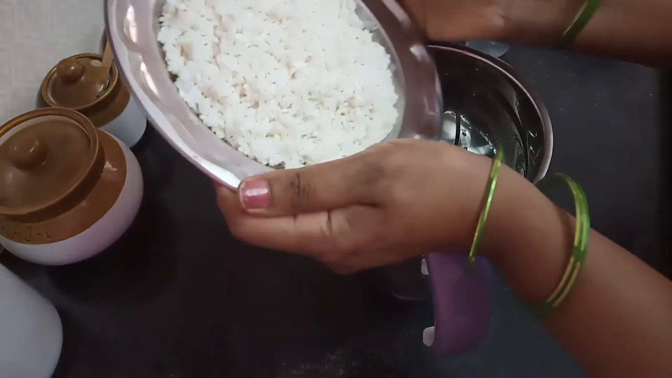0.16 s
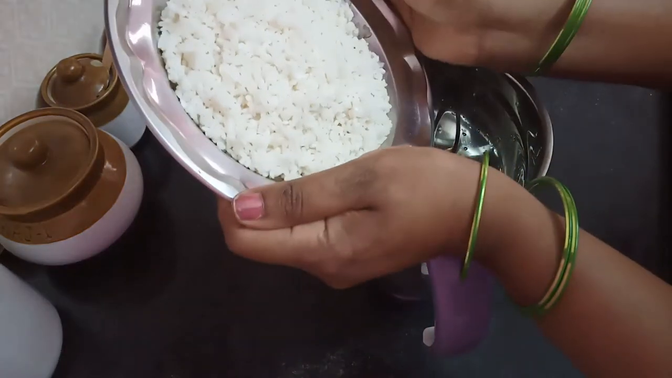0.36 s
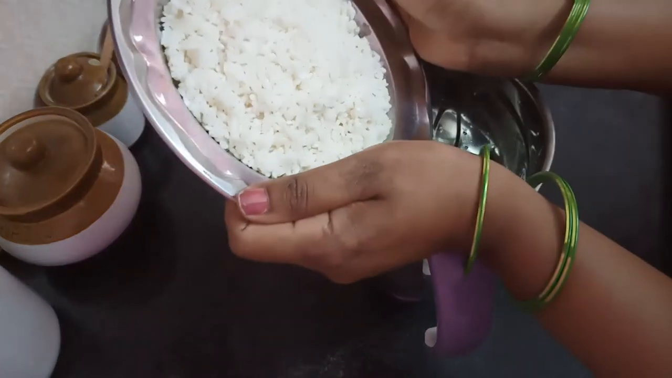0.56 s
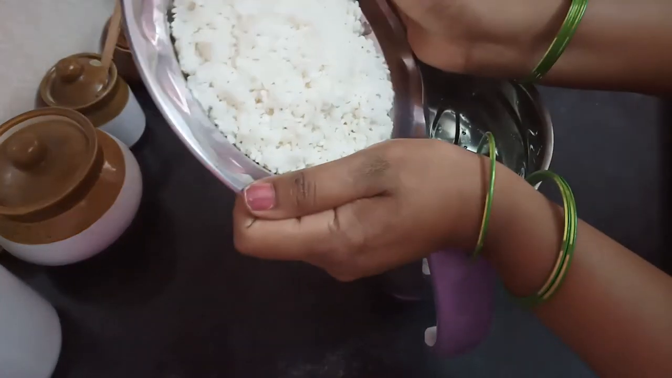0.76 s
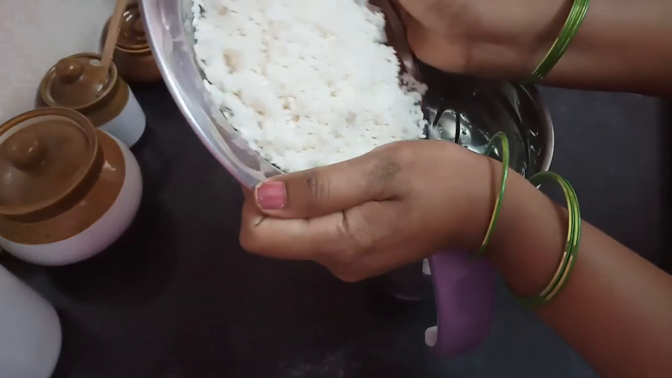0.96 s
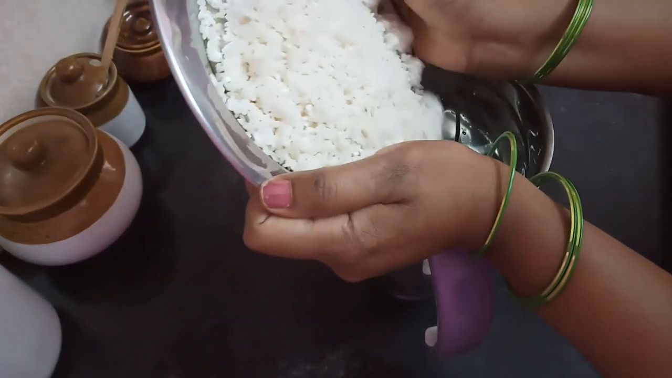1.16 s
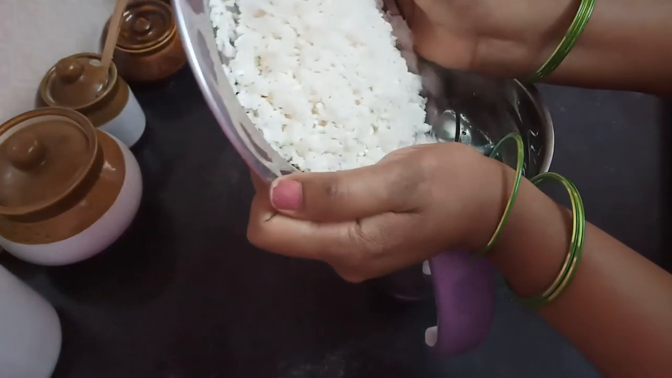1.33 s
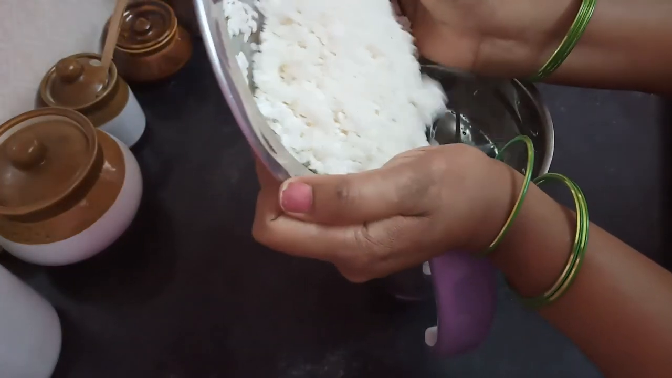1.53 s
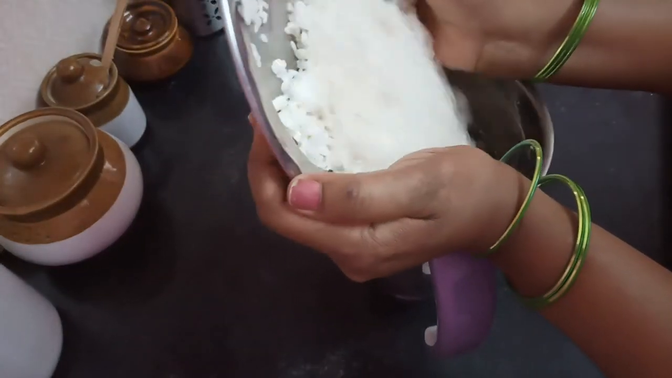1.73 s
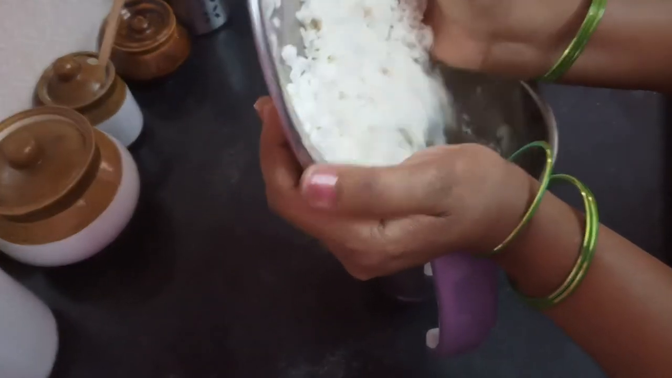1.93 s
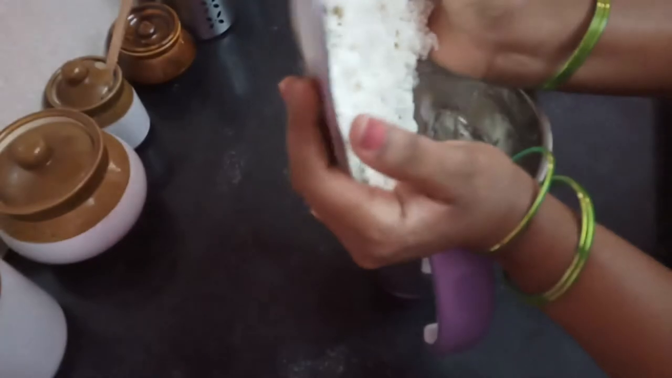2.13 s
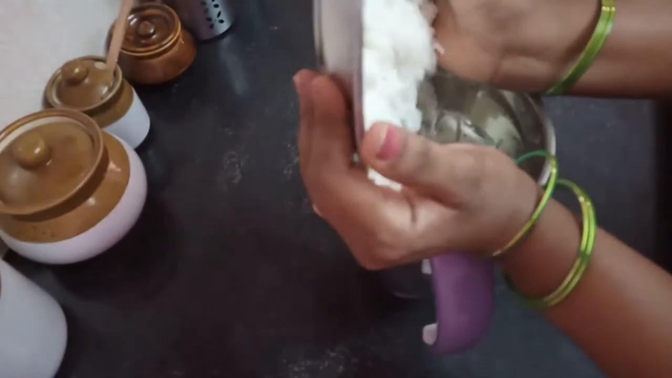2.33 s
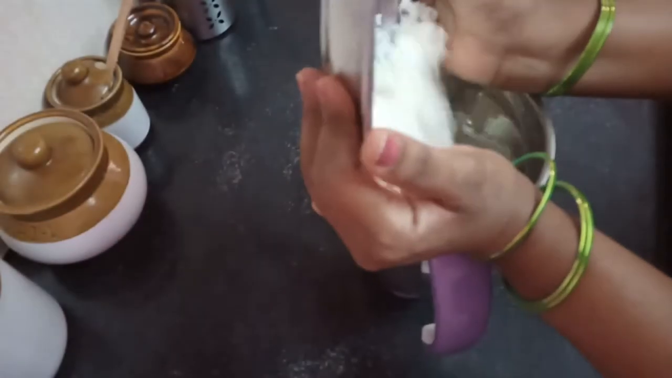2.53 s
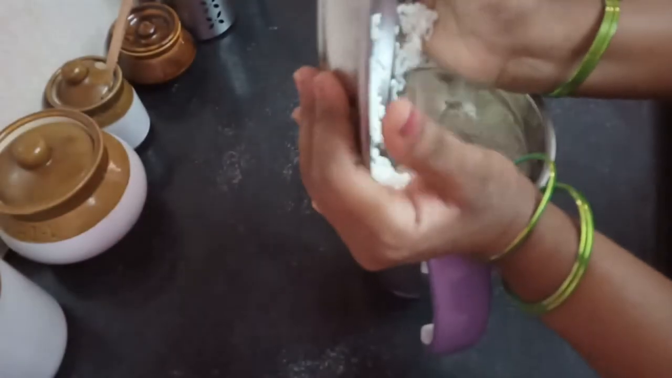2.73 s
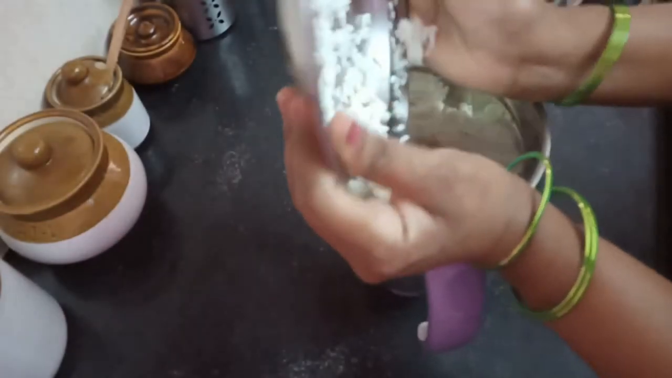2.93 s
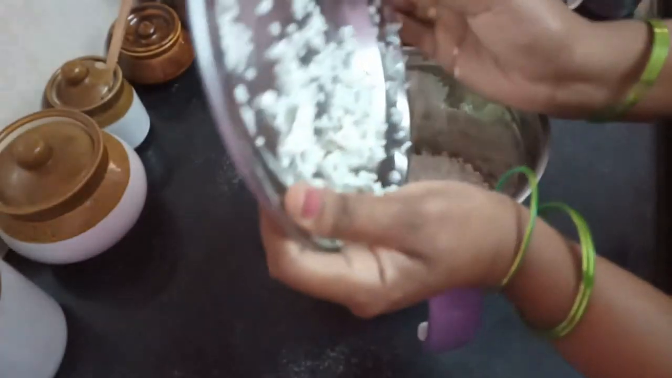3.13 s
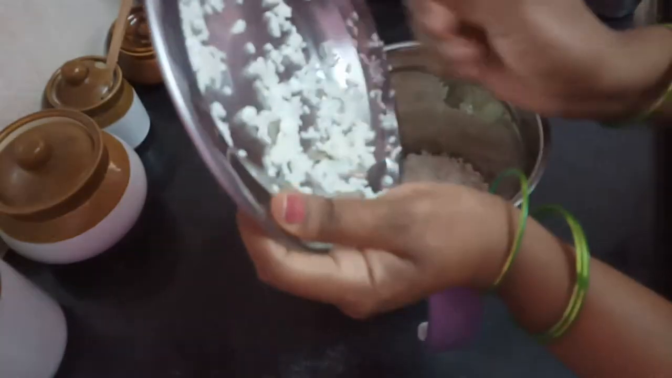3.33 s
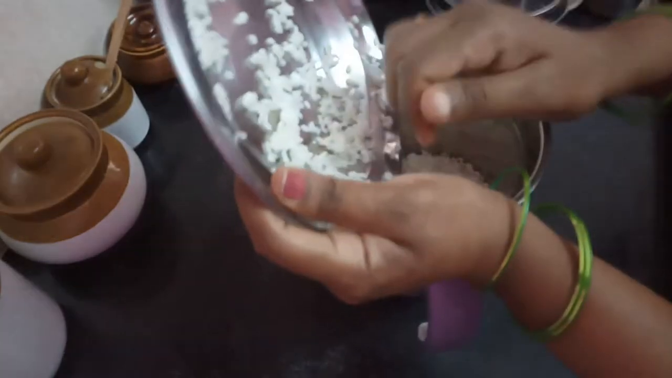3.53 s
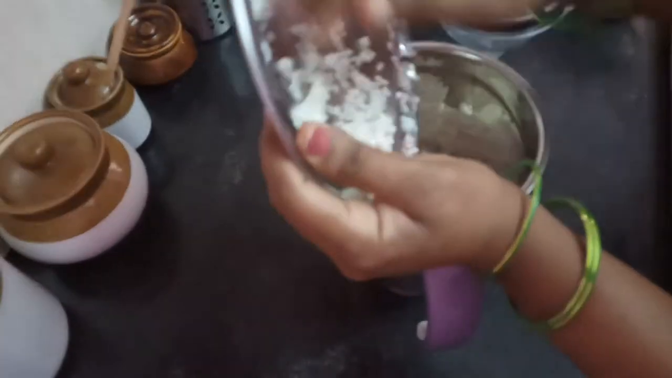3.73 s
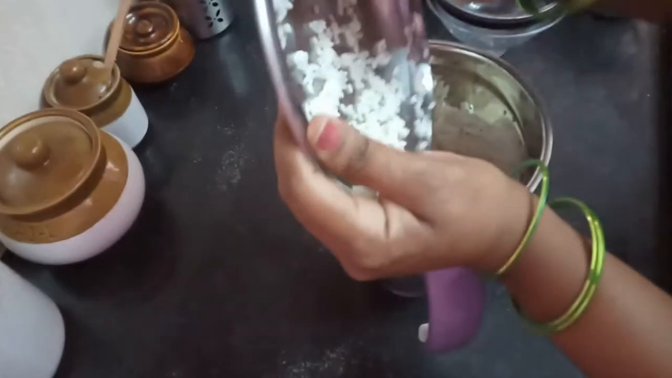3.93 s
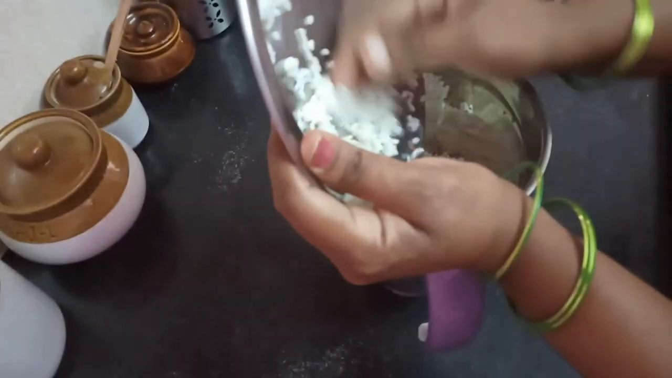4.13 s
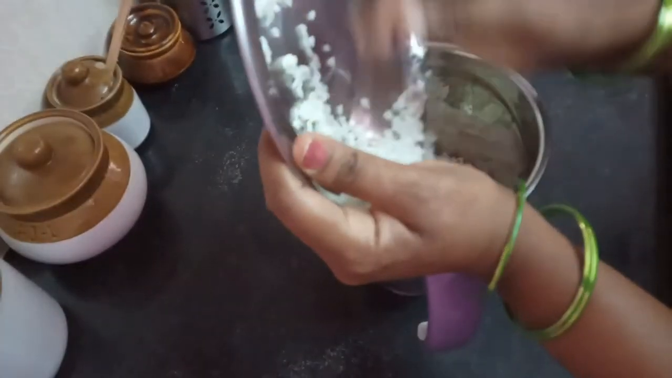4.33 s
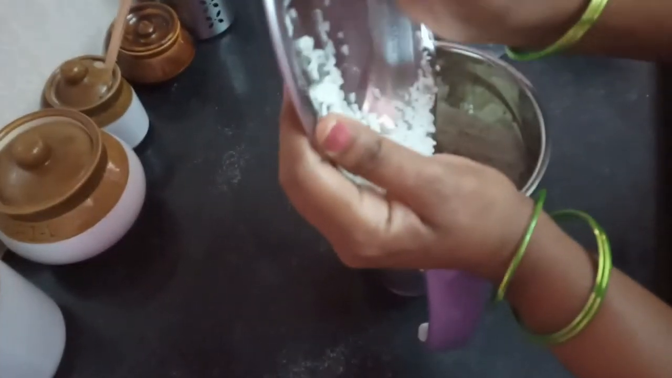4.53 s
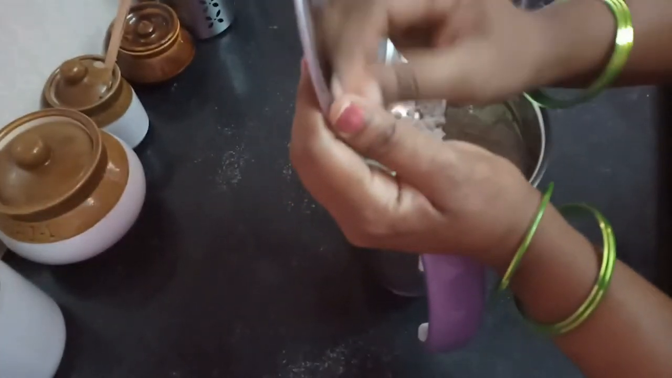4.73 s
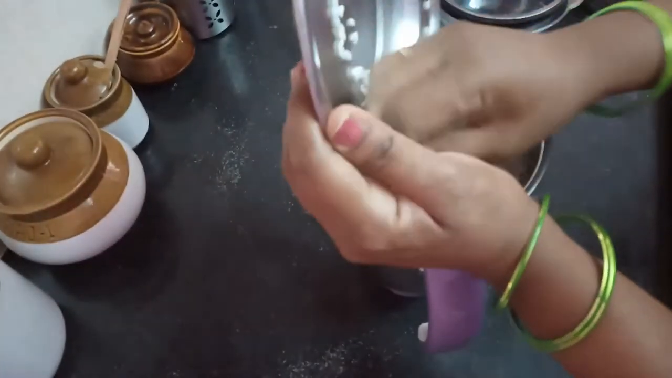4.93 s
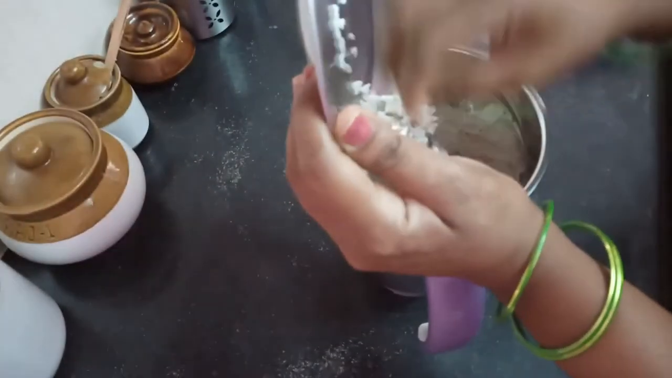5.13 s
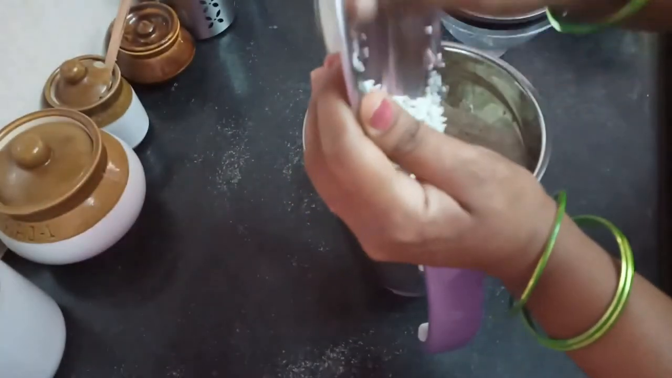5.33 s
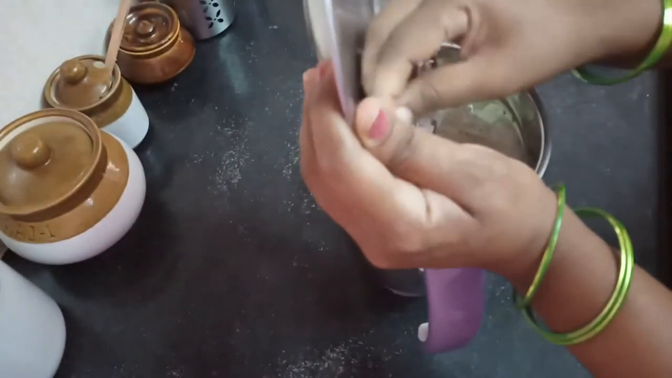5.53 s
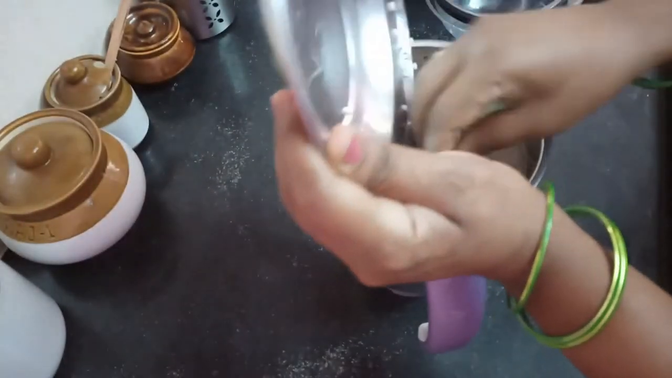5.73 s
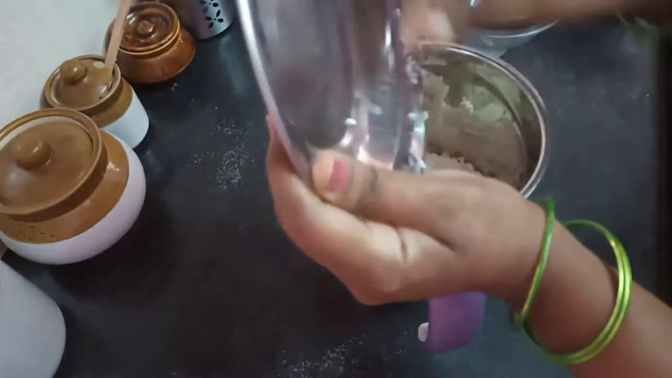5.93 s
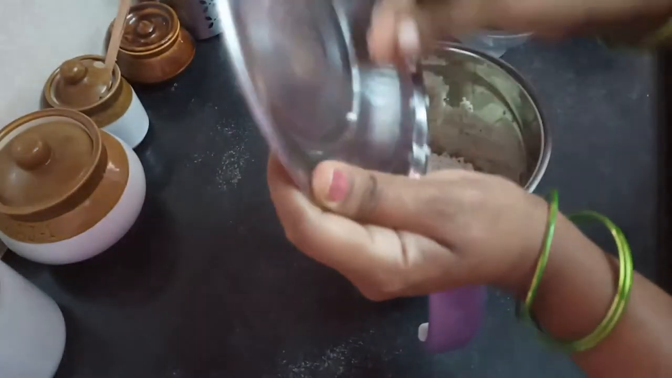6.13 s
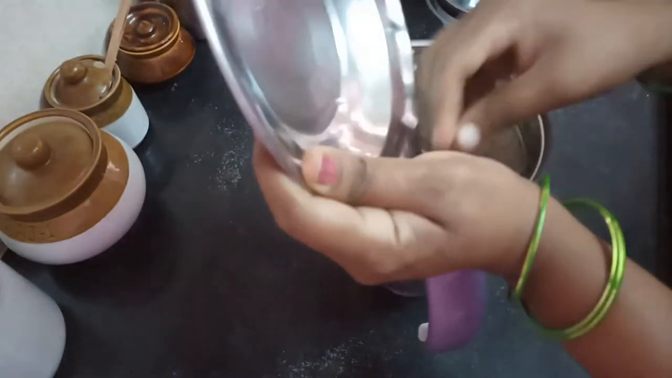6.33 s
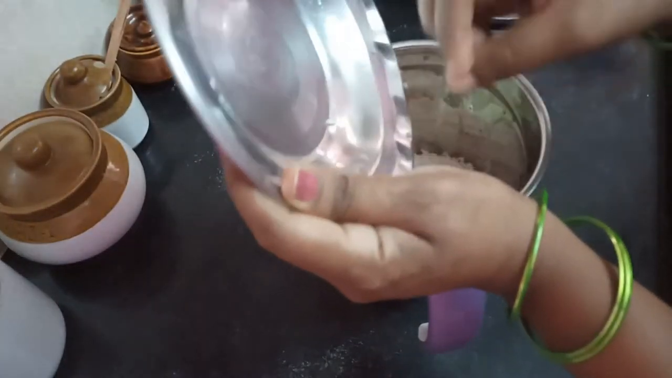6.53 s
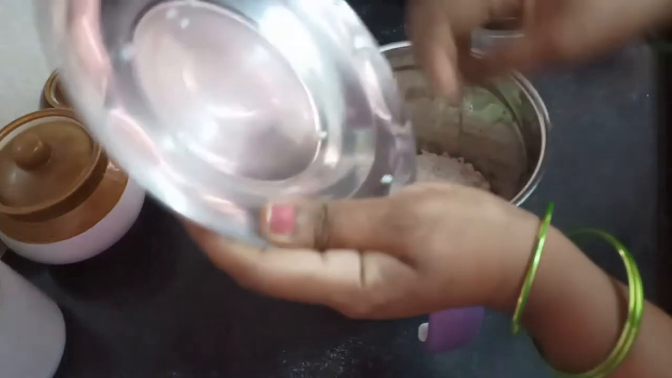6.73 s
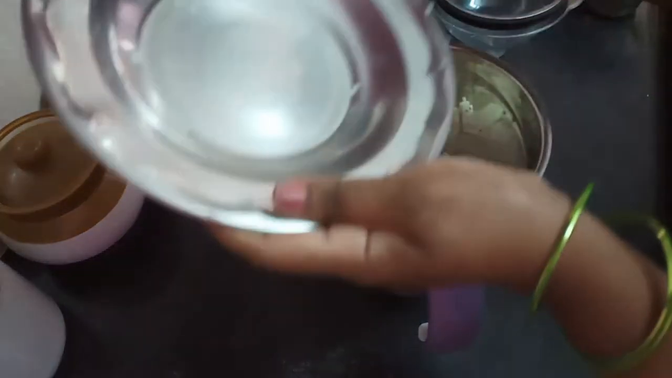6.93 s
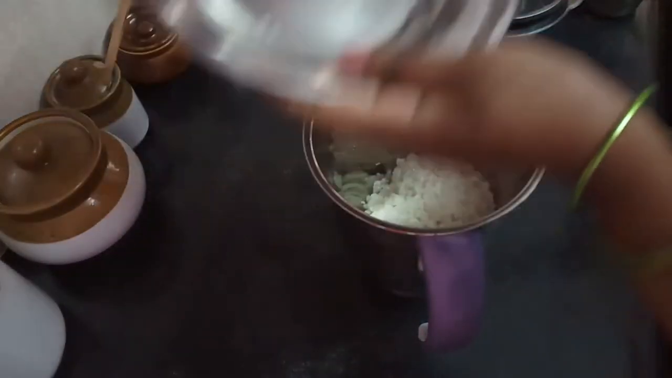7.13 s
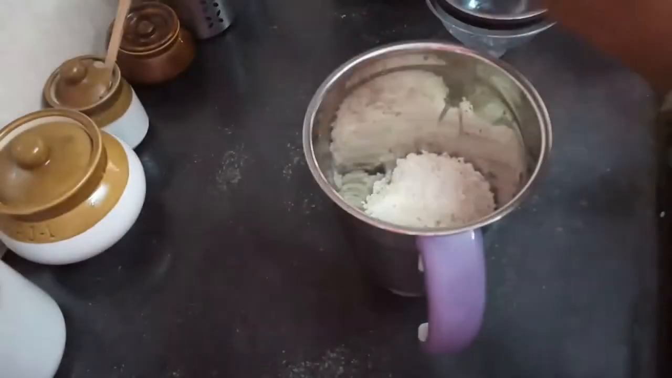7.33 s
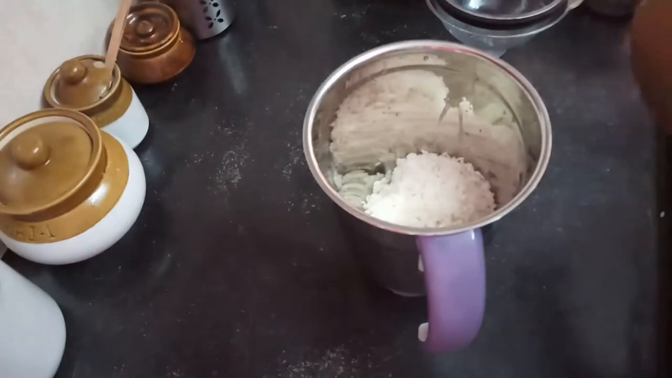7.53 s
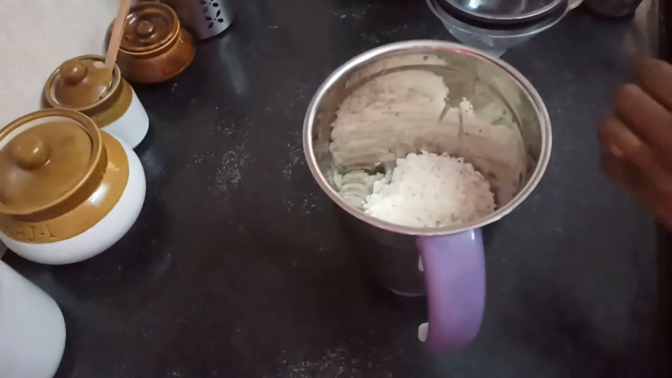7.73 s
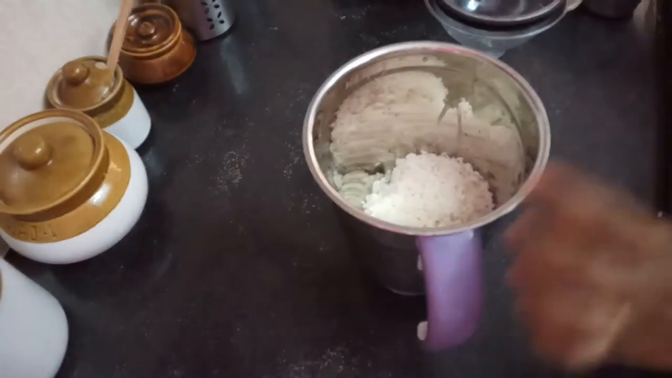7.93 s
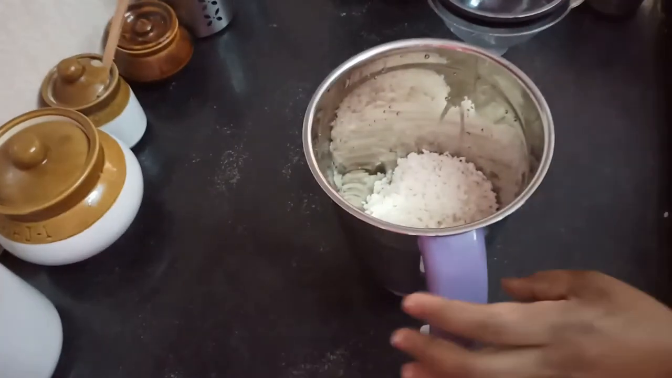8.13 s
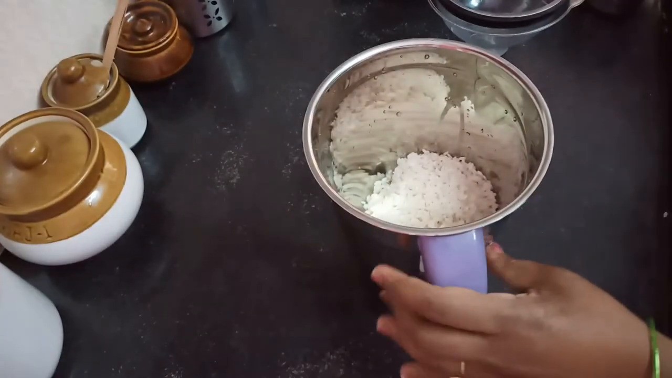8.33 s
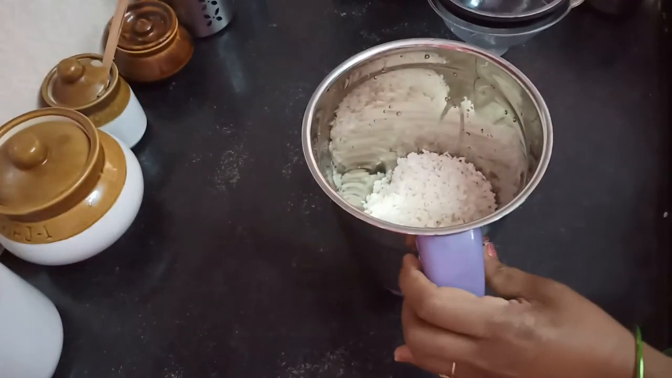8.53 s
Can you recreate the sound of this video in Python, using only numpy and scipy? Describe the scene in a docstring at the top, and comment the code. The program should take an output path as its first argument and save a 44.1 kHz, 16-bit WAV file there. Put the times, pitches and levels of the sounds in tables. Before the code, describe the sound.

Quiet room air and low hum, then bright fizzing bursts of wet grains and clumps dropping into a metal jar, strongest around two and nearly three seconds in. A dull knock or two and a glassy tick follow, then sparse wet finger wipes and splats. After a near-empty pause, a thin steel plate rattles down with a short ring. Close single microphone, small reflective kitchen, right side only, left silent.

```python
"""A small hard kitchen: soaked rice slides off a steel plate into a steel mixer jar, close to the microphone.
Wet fingers wipe the last grains; grains and clumps are noise clicks, sprays and the rings of air pockets.
The plate knocks on the jar in noise bursts, glass bangles tick, and at the end the plate is put down with
a clatter of noise and ringing steel modes. Filtered noise and sines make an uneven rush of air and a low
hum behind. One microphone feeds the right channel, behind a limiter; the left is silent."""
import sys
import numpy as np
from scipy import signal
from scipy.fft import rfft, irfft, next_fast_len
from scipy.io import wavfile
from scipy.ndimage import uniform_filter1d, map_coordinates

SR = 44100
rng = np.random.default_rng(int(sys.argv[2]) if len(sys.argv) > 2 else 0)


def dump_mix(stems):
    """Bounce the given channels to the path in sys.argv[1] as a 16-bit WAV at rate SR."""
    frames = np.atleast_2d(stems).T  # one column per channel
    limited = np.clip(frames, -1, 1)  # hard clip at full scale
    pcm = np.round(limited * 32767).astype(np.int16)
    wavfile.write(sys.argv[1], SR, pcm)


N = 383096  # length [samples]

# Spectra of a grain's snap, its wet fizz and its tap on the steel: (frequency [Hz], level [dB per Hz])
CRACKLE_SPECTRUM = [(3500, -53), (5500, -10.5), (6800, -1), (7700, 5.5), (8500, 7.5), (9400, -4.5),
                    (10500, -14), (13000, -46)]
FIZZ_SPECTRUM = [(6500, -27.5), (9500, 6.5), (11500, 4), (14500, 6), (16000, 4.5)]
BODY_SPECTRUM = [(150, -51), (500, -22.5), (1000, -26), (1800, 4.5), (2150, 5), (2550, -9.5), (3100, 13),
                 (3700, 12), (4200, 7.5), (4800, 9.5), (6000, 16.5), (8000, -44)]


def rice(rate=1800, crowding=.8, size_db=4.5, clump_db=3.5, pop_db=-3, crackle_db=-6, spray_db=-3,
         spit_db=-3, body_db=-14, hollow_db=-14, muffling=0.46):
    """Wet grains part and land in clumps; more flow means more and larger contacts, brighter fizz muffles the steel."""
    level, fizz = flow()
    body = -muffling * fizz
    level = level + clump_db * np.tanh(clumps(70))
    # rate is in contacts per second at a flow of -33.5 dB
    chance = np.clip(rate / SR * amp(level + 33.5) ** crowding, 220 / SR, .4)
    size = unit(amp(size_db * rng.standard_normal(N))) * rng.choice([-1, 1], N)
    touched = rng.random(N) < chance
    contacts = touched * size * amp(level) / np.sqrt(chance)

    # small air pockets ring high, the tiniest spit; hollows in the heap ring low, each clump at its own pitch
    pocket_hz = 7900 * np.exp(0.08 * clumps(50))
    out = popping(contacts * amp(pop_db), pocket_hz, spread=0.054, cycles=7.1)
    spit_hz = 12600 * np.exp(0.27 * np.tanh(clumps(80)))
    out += popping(contacts * amp(fizz + spit_db), spit_hz, spread=.06, cycles=5.68)
    hollow_hz = 3200 * np.exp(0.388 * np.tanh(clumps(60)))
    out += popping(contacts * amp(body + hollow_db), hollow_hz, spread=.07, cycles=3.4)

    # each contact also snaps, sprays and taps the steel under it, in that order
    layers = [(CRACKLE_SPECTRUM, crackle_db), (FIZZ_SPECTRUM, fizz + spray_db), (BODY_SPECTRUM, body + body_db)]
    for order, (spectrum, db) in enumerate(layers):
        clicks = signal.oaconvolve(contacts * amp(db), click(spectrum))
        add(out, order * .0007, clicks)
    return out


# Rice sliding off the tilted plate in surges: (time [s], flow [dB])
POUR_FLOW = [(0, -66.5), (0.88, -69), (0.95, -31), (1.04, -44), (1.2, -40), (1.38, -22), (1.53, -23),
             (1.67, -41.5), (1.76, -28), (1.85, -21.5), (1.94, -9.5), (1.99, -25.5), (2.1, -30),
             (2.17, -45), (2.5, -55), (2.6, -34), (2.76, -17), (2.8, -28.5), (2.87, -31.5), (2.98, -65.5)]
# Fingers rub over the wet steel; a stroke that sweeps more rice is brighter:
# (time [s], length [s], level [dB], fizz re level [dB])
WIPE_STROKES = [(0.478, 0.2, -51.5, -20), (4.045, 0.38, -48.5, -28.5), (4.445, .03, -34.5, -18.5),
                (4.76, 0.21, -47.5, -8), (5.059, .12, -36.5, -6), (5.33, 0.11, -45, -21),
                (5.522, 0.062, -43, -26), (5.726, 0.044, -38.5, -23.5), (5.88, 0.064, -36.5, 4.5),
                (6.225, 0.057, -49, -17), (8.646, .08, -34, -6.5)]
WIPE_RISE_S, WIPE_RELEASE_S = .04, .07  # time for a stroke to swell and to die away by 20 dB
WIPE_FADE_DB = 8  # the pressure eases along a stroke
POUR_FIZZ_DB, FIZZ_GROWS = -1.5, .1  # fizz re flow in a moderate pour; dB more per dB of flow
MODERATE_DB = -30  # flow of a moderate pour


def flow():
    """How much rice moves and how brightly it fizzes, both in dB: the pour and the strokes of the fingers."""
    t = np.arange(N) / SR
    outside = np.maximum(POUR_FLOW[0][0] - t, 0) + np.maximum(t - POUR_FLOW[-1][0], 0)
    level = curves(POUR_FLOW)[0] - 20 * np.minimum(outside / WIPE_RELEASE_S, 2)
    fizz = POUR_FIZZ_DB + FIZZ_GROWS * (level - MODERATE_DB)
    for s, length, db, bright in WIPE_STROKES:
        age = t - s
        stroke = db - WIPE_FADE_DB * np.clip(age / length, 0, 1)
        before, after = np.maximum(-age, 0), np.maximum(age - length, 0)
        stroke -= 20 * (before / WIPE_RISE_S + after / WIPE_RELEASE_S)
        # the stronger movement sets both flow and brightness
        fizz = np.where(stroke > level, bright, fizz)
        level = np.maximum(level, stroke)
    return level, fizz


def clumps(rate):
    """A random value that holds for one clump and jumps to the next, about rate times a second."""
    clump_index = np.cumsum(rng.random(N) < rate / SR)
    return rng.standard_normal(N + 1)[clump_index]


def popping(contacts, hz, spread, cycles):
    """Every contact gives one pop, near the pitch hz of that moment."""
    at = np.flatnonzero(contacts)
    life = np.arange(256)  # samples
    pitch = hz[at, None] * np.exp(spread * rng.standard_normal((len(at), 1)))
    pops = pop(pitch, life / SR, cycles)
    pops *= (contacts[at] / np.linalg.norm(pops, axis=1))[:, None]
    return np.bincount((at[:, None] + life).ravel(), pops.ravel(), N)[:N]


def pop(hz, t, cycles):
    """A tiny pocket of air opens in a water film and rings for a few cycles."""
    age = hz * t / cycles
    return age * np.exp(-age) * np.sin(2 * np.pi * hz * t)


# Air pockets pop as wet rice lets go of the steel: (time [s], level [dB], ring [Hz], crackle re level [dB])
POCKET_POPS = [(0.51, -36.5, 8530, -3), (0.608, -38, 9220, -13), (0.922, -19, 7850, -15),
               (0.943, -16.5, 8500, -6.5), (0.958, -18.5, 8600, -7), (1.356, -9, 8900, -5),
               (1.841, -12.5, 8400, -6), (2.198, -28, 7600, -19), (2.362, -29, 7870, -11),
               (2.528, -27.5, 6800, -11), (2.58, -16.5, 7170, -4.5), (3.832, -31, 6720, -31),
               (4.036, -32, 6570, -15.5), (4.305, -16.5, 7030, -10), (4.5, -27.5, 8100, -6.5),
               (4.782, -25.5, 6700, -10), (5.318, -27.5, 7450, 2), (5.54, -27.5, 6850, -17),
               (5.737, -25.5, 7480, 2), (6.046, -26, 7270, -2.5), (6.219, -35.5, 7300, -14)]
# Clumps land in the jar with a wet spray; on bare steel they tap harder:
# (time [s], level [dB], tap strength [dB])
CLUMP_SPLATS = [(0.906, -24, -23), (0.979, -26, 2), (1.069, -27, -8), (1.111, -29.5, -1),
                (1.156, -25.5, -2.5), (1.243, -16.5, -32), (1.276, -22.5, -5), (1.6, -20, -25.5),
                (1.832, -12, -27), (1.873, -7.5, -7.5), (2.123, -18, -13), (2.256, -28, -28),
                (2.321, -34.5, -5.5), (2.392, -26.5, -34.5), (2.543, -39, 12.5), (2.638, -21, -10.5),
                (2.686, -11, -12), (2.709, -8, -29), (2.753, -8.5, -4.5), (4.441, -21.5, -11.5),
                (4.457, -30, -14), (4.734, -23, -18), (5.021, -33, -9.5), (5.061, -17.5, -9.5),
                (5.87, -20.5, -7), (5.91, -24.5, -7.5), (6.436, -34.5, -0.5), (6.647, -31, -7.5)]
SPLAT_HZ, HOLLOW_HZ = 8040, 3477  # central ring of the pockets in a landing clump, and of a clump's hollow


def smacks():
    """A bursting air pocket is nearly all ring; a landing clump is mostly spray."""
    out, level = np.zeros(N), flow()[0]
    for s, db, hz, crackle in POCKET_POPS:
        burst_pocket = smack(hz, level[round(s * SR)], cycles=4.4, pop_db=0.5, crackle_db=crackle,
                             fizz_db=crackle - 12.5, body_db=crackle - 12, hollow_db=crackle - 14,
                             spray_s=.033, rise_s=.003)
        add(out, s, amp(db) * burst_pocket)
    for s, db, tap in CLUMP_SPLATS:
        hz = SPLAT_HZ * np.exp(.05 * rng.standard_normal())
        landing = smack(hz, level[round(s * SR)], cycles=4, pop_db=-4, crackle_db=-4.5, fizz_db=0.5,
                        body_db=tap - 4, hollow_db=tap - 4, spray_s=.036, rise_s=.004)
        add(out, s, amp(db) * landing)
    return out


def smack(hz, flow_db, cycles, pop_db, crackle_db, fizz_db, body_db, hollow_db, spray_s, rise_s):
    """One wet clump: a high pop and the lower one of its hollow, inside a short spray."""
    # in full flow a clump has many grains: less pop, a longer and denser spray
    bulk = np.clip((flow_db + 41) / 14, 0, 1)
    spray_s = spray_s + 0.012 * bulk
    high = pocket(hz, pop_db - 7 * bulk, cycles, spread=.08, weaker_db=7.5)
    low_hz = HOLLOW_HZ * np.exp(.13 * rng.standard_normal())
    hollow = pocket(low_hz, hollow_db, cycles=7.6, spread=.18, weaker_db=2)
    spray = burst(CRACKLE_SPECTRUM, crackle_db + 5 * bulk, t60=spray_s, rise_s=rise_s)
    spray = spray + burst(FIZZ_SPECTRUM, fizz_db, t60=spray_s, rise_s=rise_s)
    tap = burst(BODY_SPECTRUM, body_db, t60=spray_s, rise_s=rise_s)
    return high + hollow + spray + tap


def pocket(hz, db, cycles, spread, count=3, follow_s=.003, weaker_db=4):
    """An air pocket breaks up: one pop at hz, then weaker ones close to it in pitch and time."""
    t = np.arange(SR // 4) / SR
    out = pop(hz, t, cycles)
    for detune, wait in zip(rng.standard_normal(count), rng.random(count)):
        age = np.maximum(t - follow_s * (.5 + 2 * wait), 0)
        out = out + amp(-weaker_db) * pop(hz * np.exp(spread * detune), age, cycles)
    return blow(out, db)


# The held plate knocks on the jar: (time [s], level [dB], thud strength [dB], edge re level [dB])
PLATE_KNOCKS = [(2.969, -24.5, 0, -32), (2.982, -18.5, -18, 4.5), (3.034, -33, -18, -21),
                (3.250, -17.5, -29, -5)]
# Spectra of the knock, its low thud and its bright edge: (frequency [Hz], level [dB per Hz])
KNOCK_SPECTRUM = [(280, -28), (550, -2), (1100, 3.5), (1700, 9.5), (2400, 4), (3600, 1), (5000, -7.5),
                  (8000, -47)]
THUD_SPECTRUM = [(70, -27), (130, -0.5), (190, -3), (300, 0), (520, 5.5), (1100, -11), (1700, -30.5)]
EDGE_SPECTRUM = [(800, -44), (2500, -21), (5000, 3), (6300, 1.5), (8300, 7.5), (10500, -7.5), (15000, -14)]


def knocks():
    """The hand damps the plate, so it only knocks on the jar's rim."""
    out = np.zeros(N)
    for s, db, thud, edge in PLATE_KNOCKS:
        hit = burst(KNOCK_SPECTRUM, db + 4, t60=0.044)
        hit = hit + burst(THUD_SPECTRUM, db + thud + 3, t60=0.03)
        hit = hit + burst(EDGE_SPECTRUM, db + edge, t60=0.015)
        add(out, s, hit)
    return out


# Loose contacts of the plate: (time [s], ring strength [dB], clatter strength [dB])
PLATE_CLANGS = [(5.736, -31, -46), (6.045, -33.5, -45), (6.492, -34.5, -62), (8.319, -13.5, -11.5),
                (8.345, -14, -14.5), (8.369, -11.5, -21), (8.398, -36, -10), (8.421, -15, -17),
                (8.558, -63, -29), (8.639, -41, -47.5)]
# Modes of the plate when no hand grips it: (frequency [Hz], level [dB], t60 [s])
PLATE_MODES = [(472, -28, 0.58), (723, -25, 0.47), (1086, -26, .3), (1856, -18, 0.39), (2055, 3.5, 0.26),
               (2080, -10.5, 0.44), (2295, -11, .3), (2700, -15, .27), (2755, -18, 0.34), (3243, -6, 0.24),
               (3340, -13, 0.29), (4120, -16.5, 0.3), (4320, -17, 0.22), (4400, -24.5, .35),
               (5240, -23, 0.35), (6150, -38, 0.34), (7300, -24.5, 0.28), (7684, -12, 0.25),
               (7973, -40, 0.23), (9000, -21, 0.34)]
# Spectrum of the clatter: (frequency [Hz], level [dB per Hz])
CLATTER_SPECTRUM = [(200, -53), (450, -19), (750, -7.5), (1100, 3), (1700, -7), (2200, 2), (3300, -3),
                    (3900, -16.5), (5000, -25.5), (6200, -15), (7600, 0.5), (9500, -13.5), (15000, -25)]


def plate(held_until_s=8, grip=0.64):
    """Loose contacts ring the steel, briefly while gripped; put down, it rocks from edge to edge.

    Gives (ring, clatter)."""
    tone, clatter = np.zeros(N), np.zeros(N)
    for s, ring_db, clatter_db in PLATE_CLANGS:
        damping = grip if s < held_until_s else 1
        modes = [(hz, db, t60 * damping) for hz, db, t60 in PLATE_MODES]
        add(tone, s, amp(ring_db - 5.0) * ring(modes, s, scatter_db=7.5))
        add(clatter, s, burst(CLATTER_SPECTRUM, clatter_db + 1.5, t60=0.26))
    return tone, clatter


# Touches of the bangles: (time [s], level [dB], brightness [dB per octave])
BANGLE_TOUCHES = [(3.314, -30, 25), (3.333, -23.5, -1), (3.441, -26, 29)]
# Modes of a bangle before the brightness tilt: (frequency [Hz], level [dB])
GLASS_MODES = [(7050, -4), (9000, -3), (11300, -9), (13200, -1.5), (14500, -10)]
GLASS_T60 = .035  # s


def bangles(ring_db=-5, tick_db=-1):
    """Glass bangles touch, damped by the wrist: a bright tick and short ring; a glancing touch rings high modes."""
    out = np.zeros(N)
    for s, db, bright in BANGLE_TOUCHES:
        def tilted(points):
            return [(hz, level + bright * np.log2(hz / GLASS_MODES[0][0])) for hz, level in points]
        modes = [(hz, level, GLASS_T60) for hz, level in tilted(GLASS_MODES)]
        add(out, s, blow(ring(modes, s, scatter_db=1.5), db + ring_db))
        add(out, s, burst(tilted(FIZZ_SPECTRUM), db + tick_db, t60=0.064))
    return out


# Course of the room's rush, before a constant lift and a wobble: (time [s], level [dB])
RUSH_LEVEL = [(0.3, -54.5), (0.75, -51), (1.85, -50), (2.1, -62), (2.8, -48), (3.55, -55), (4.1, -48.5),
              (5.2, -50), (5.45, -45), (6.95, -49), (7.25, -45.5), (7.9, -48.5)]
# Spectrum of the rush: (frequency [Hz], level [dB per Hz])
AIR_SPECTRUM = [(30, -18), (75, -14.5), (130, -9), (210, -14.5), (400, -7.5), (750, -9), (1050, 1.5),
                (1550, -2), (1900, -5.5), (3400, -13.5), (4200, -22.5), (5500, -41.5), (8000, -35),
                (13000, -53)]
# Hum of motors, before its wobble: (frequency [Hz], level [dB])
HUM_TONES = [(100, -57), (121.5, -69), (375, -70)]


def background(patchy_db=2.5):
    """An uneven rush of air whose colour wavers, and the hum of motors."""
    t = np.arange(N) / SR
    z = signal.stft(noise(AIR_SPECTRUM, size=N), nperseg=1024)[2]
    # random gains smoothed over frequency, then over time
    patches = uniform_filter1d(rng.standard_normal(z.shape), size=12, axis=0)
    patches = uniform_filter1d(patches, size=9, axis=1)
    air = unit(signal.istft(z * amp(patchy_db * unit(patches)), nperseg=1024)[1][:N])
    air *= amp(curves(RUSH_LEVEL)[0] + 3.0 + 1.0 * wobble(16))
    hum = np.zeros(N)
    for hz, db in HUM_TONES:
        strength = amp(db + .6 * wobble(3.8)) * np.sqrt(2)
        hum += strength * np.sin(2 * np.pi * hz * t + .15 * wobble(3))
    return air + hum


# Decay of the room: (frequency [Hz], t60 [s])
ROOM_DECAY = [(200, 0.65), (1000, 0.45), (3000, 0.3), (8000, 0.24), (15000, 0.18)]


def kitchen(x, gap_s=.002):
    """The answer of the counter and the close, hard walls: noise whose treble dies away sooner."""
    hz, t, z = signal.stft(rng.standard_normal(SR * 2 // 3), SR, nperseg=256)
    decay = amp(-60 * t / along(ROOM_DECAY, hz)[:, None])
    tail = signal.istft(z * decay, SR, nperseg=256)[1]
    response = np.pad(tail, (round(gap_s * SR), 0)) / np.linalg.norm(tail)
    return signal.fftconvolve(x, response)[:N]


def amp(db):
    """Decibels to gain."""
    return 10 ** (np.asarray(db) / 20)


def unit(x):
    """Scaled to rms 1."""
    return x / np.sqrt(np.mean(x ** 2) + 1e-20)


def along(points, hz):
    """(Hz, value) points read on a log axis."""
    f, v = np.transpose(points)
    return np.interp(np.log(hz + 1), np.log(f + 1), v)


def curves(rows):
    """One value per sample for each column after the time."""
    s, *cols = np.transpose(rows)
    return [np.interp(np.arange(N) / SR, s, c) for c in cols]


def wobble(rate):
    """A smooth random curve, rate knots a second."""
    knots = rng.standard_normal(int(N * rate / SR) + 4)
    return map_coordinates(knots, [np.arange(N) * rate / SR])


def noise(spectrum, size):
    """Coloured noise of rms 1."""
    m = next_fast_len(size)
    colour = amp(along(spectrum, np.fft.rfftfreq(m, 1 / SR)))
    return unit(irfft(rfft(rng.standard_normal(m)) * colour, m)[:size])


def click(spectrum, size=1024):
    """The causal click of unit energy that has this spectrum."""
    cepstrum = irfft(np.log(amp(along(spectrum, np.fft.rfftfreq(size, 1 / SR)))))
    # folding the cepstrum forward in time gives minimum phase
    n = np.arange(size)
    h = irfft(np.exp(rfft(2 * cepstrum * (n < size // 2) * (n > 0))))
    return h / np.linalg.norm(h)


BLOW_S = .005  # a blow's level is that of its energy spread over this time


def blow(x, db):
    """x with the energy of BLOW_S seconds at this level."""
    return amp(db) * x * np.sqrt(BLOW_S * SR) / np.linalg.norm(x)


def burst(spectrum, db, t60, rise_s=0.00037):
    """Noise that swells with time constant rise_s and dies away."""
    t = np.arange(SR // 4) / SR
    envelope = amp(-60 * t / t60) * (1 - np.exp(-t / rise_s))
    return blow(noise(spectrum, size=len(t)) * envelope, db)


def ring(modes, s, scatter_db, attack_s=0.0007):
    """Decaying modes struck at time s, each strength scattered at random by scatter_db; blows add up in swing."""
    t = np.arange(SR * 2 // 3) / SR
    swing = np.zeros(len(t))
    for hz, db, t60 in modes:
        strength = amp(db + scatter_db * rng.standard_normal() - 60 * t / t60)
        swing += strength * np.sin(2 * np.pi * hz * (t + s))  # phase runs on from blow to blow
    return swing * (1 - np.exp(-t / attack_s))


def add(track, s, x):
    """Mix x into the track at time s."""
    part = track[max(round(s * SR), 0):][:len(x)]
    part += x[:len(part)]


def scene():
    """Everything as it reaches the microphone, which feeds the right channel alone."""
    tone, clatter = plate()
    wet_rice = rice() + smacks()
    hard = knocks() + clatter + bangles()
    reflected = kitchen(amp(-4.5) * wet_rice + amp(-5.5) * hard + amp(-16) * tone)
    sound = wet_rice + hard + tone + reflected + background()
    return np.array([np.zeros(N), 2 * sound])


TOP_HZ, LOW_HZ = 15900, 75  # band limit and bass cut of the microphone channel


def record(dry, threshold_db=-8, release_db=17):
    """A limiter ducks at once and recovers at release_db a second; then rounded peaks, bass cut, band limit."""
    power = np.abs(uniform_filter1d(dry[1] ** 2, size=220))
    over = np.maximum(10 * np.log10(power + 1e-12) - threshold_db, 0)
    recovery = release_db * np.arange(N) / SR
    gain_db = uniform_filter1d(recovery - np.maximum.accumulate(over + recovery), size=129)
    held = dry * amp(gain_db)
    held = held / (1 + held ** 8) ** (1 / 8)  # rounded peaks
    m = next_fast_len(N + SR // 2)
    hz = np.fft.rfftfreq(m, 1 / SR)
    band_limit = np.clip((TOP_HZ - hz) / 400 + .5, 0, 1)
    bass_cut = 1 - .85 / (1 + (hz / LOW_HZ) ** 10)
    return irfft(rfft(held, m) * bass_cut * band_limit, m)[:, :N]


dry = scene()
out = record(dry)
dump_mix(out)
```